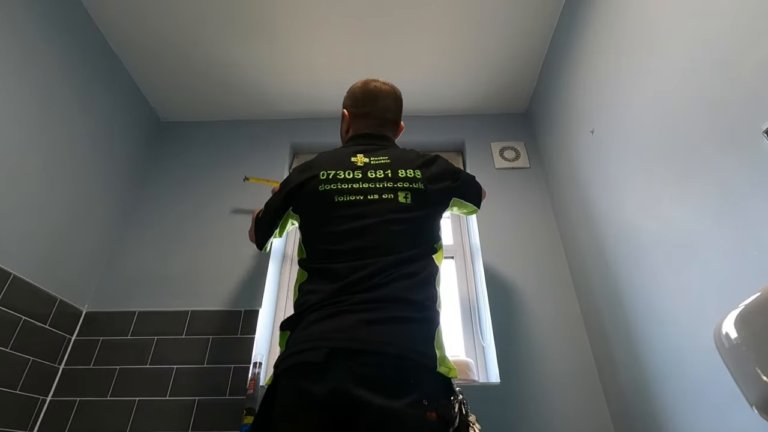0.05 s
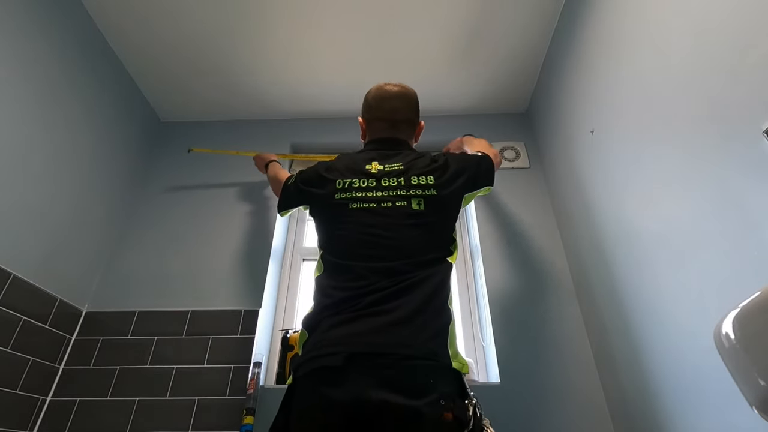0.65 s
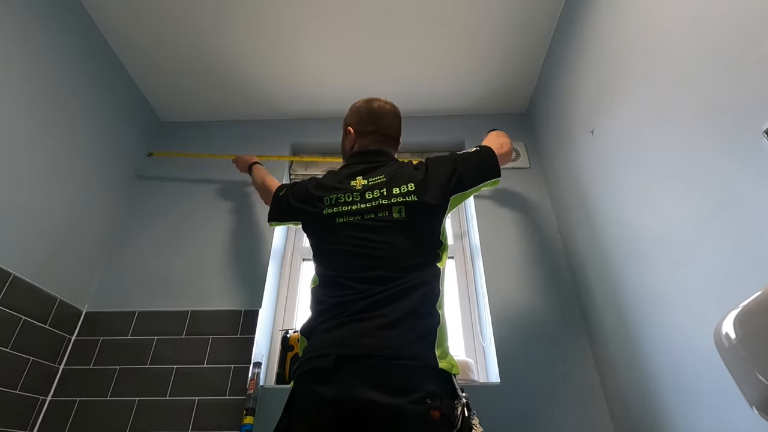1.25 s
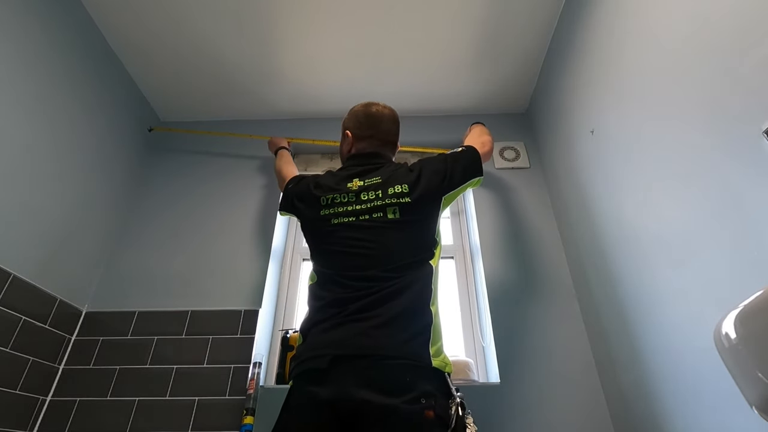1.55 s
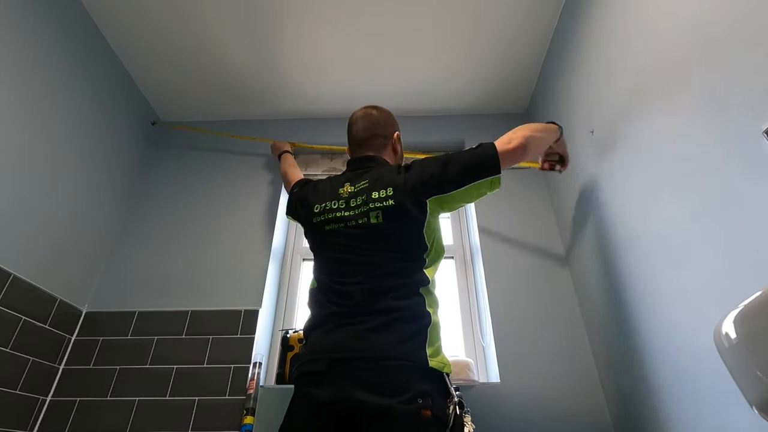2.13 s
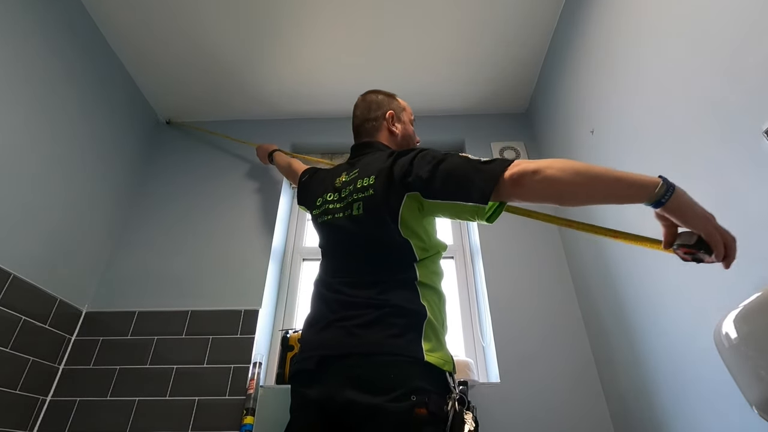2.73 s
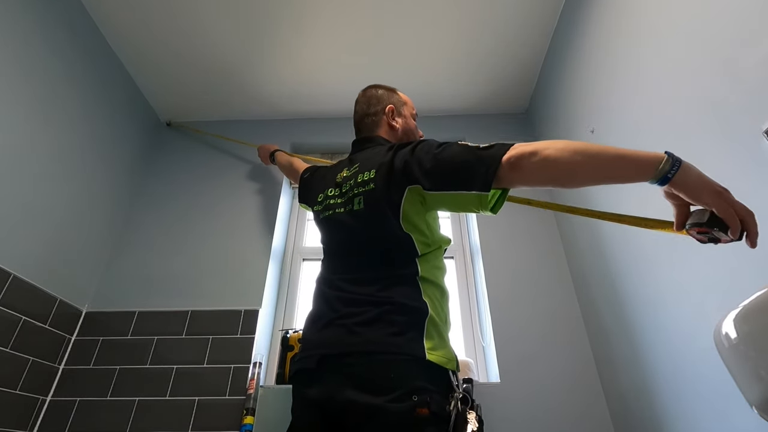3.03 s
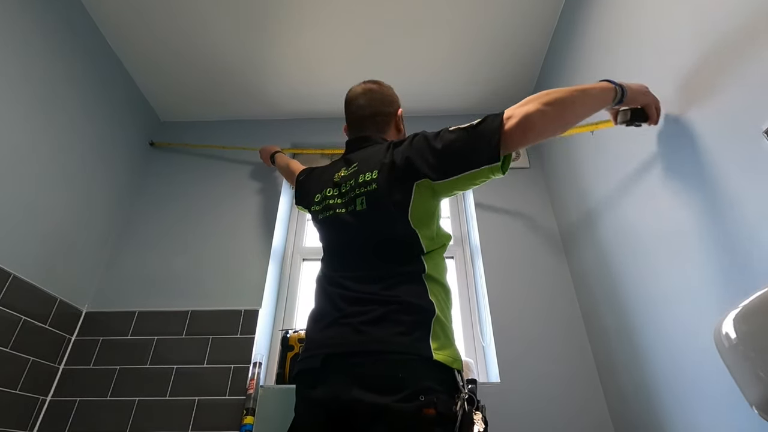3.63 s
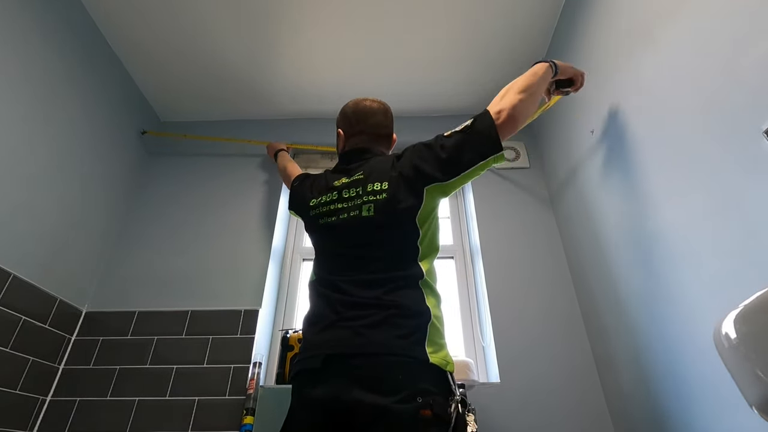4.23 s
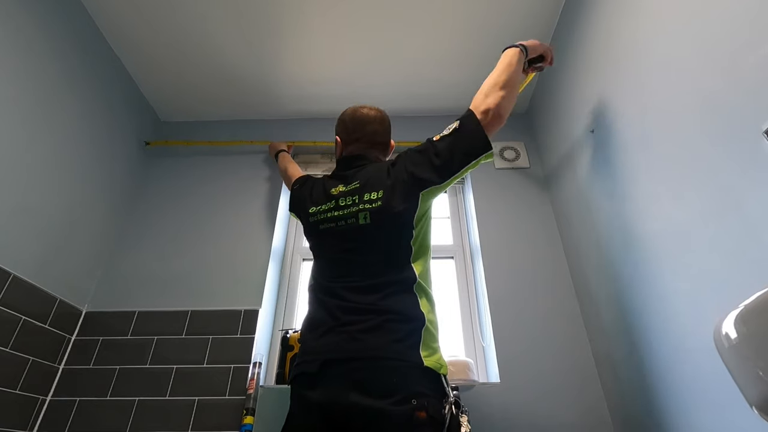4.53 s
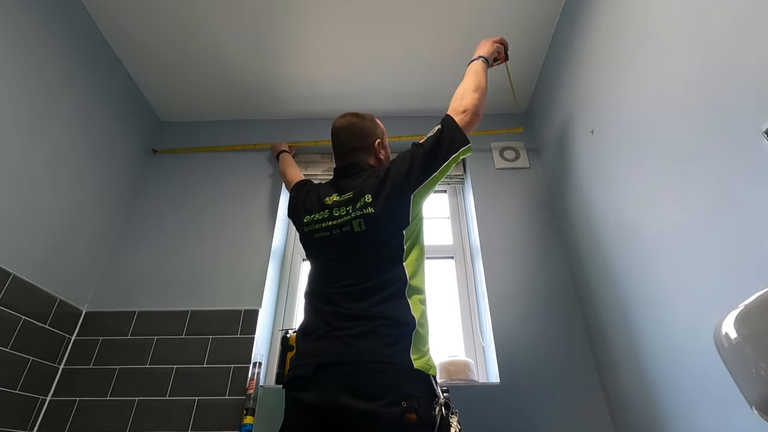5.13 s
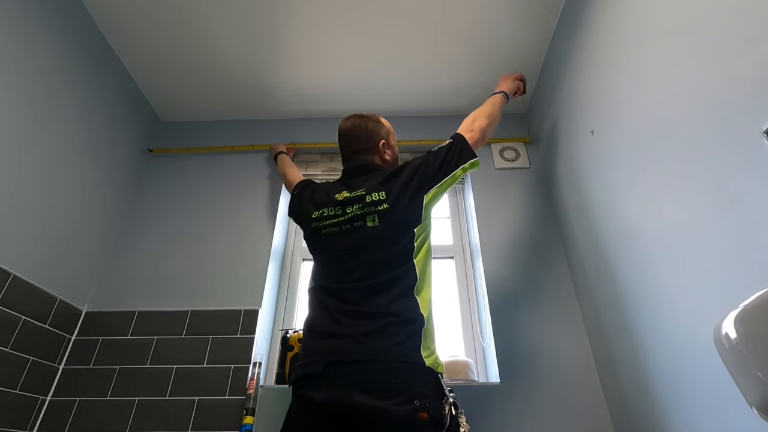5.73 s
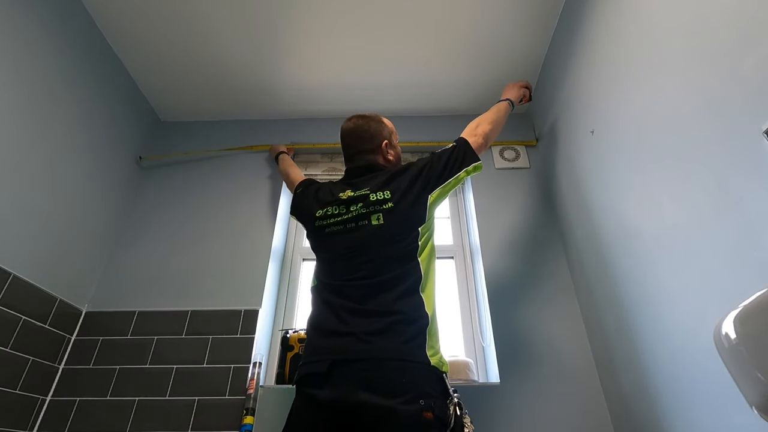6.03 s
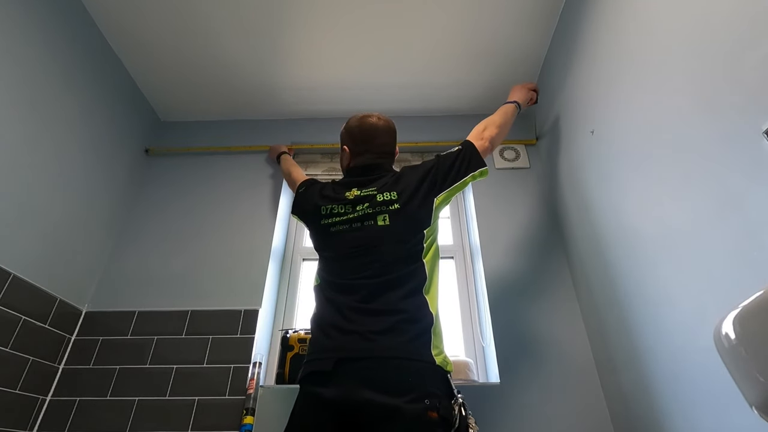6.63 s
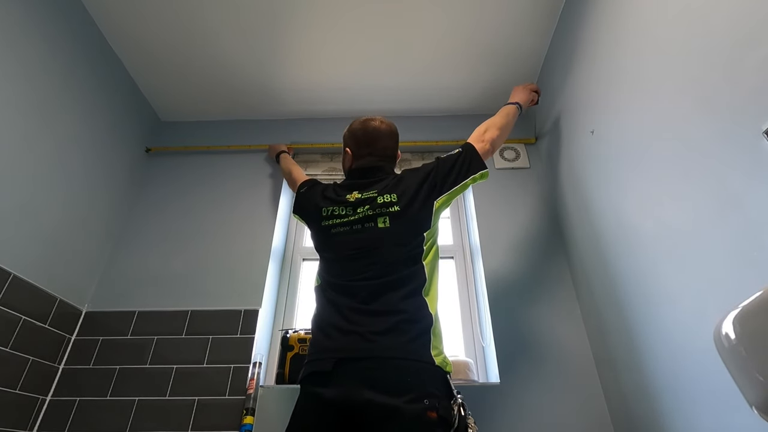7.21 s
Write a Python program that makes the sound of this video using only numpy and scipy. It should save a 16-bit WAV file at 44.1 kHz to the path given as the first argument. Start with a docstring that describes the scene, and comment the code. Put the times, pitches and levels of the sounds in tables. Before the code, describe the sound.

A steel tape measure is pulled out along a wall in uneven, hissing strokes with brief squeals. The case and a hand rub and bump dully on the plaster. The blade clicks and rattles, then buckles with two loud ringing slaps, and its hook clanks in the corner. Softer slides and clicks follow. The microphone is close to the case, in a small bathroom with a short, dense echo.

```python
"""Tape measure in a bathroom

A steel tape is pulled out along the wall of a small, hard-walled bathroom, heard in nearly mono on a
camera microphone near the case. Case and hand rub, hum and bump on the plaster. The blade slips
through the mouth of the case, hissing and squealing, then buckles, slaps the wall and rings; its hook
clanks in the corner. The close walls answer with a short, dense echo over faint room tone."""
import sys
import numpy as np
from scipy import signal
from scipy.io import wavfile
from scipy.ndimage import uniform_filter1d, minimum_filter1d

SR = 44100
rng = np.random.default_rng(int(sys.argv[2]) if len(sys.argv) > 2 else 0)


def inscribe(sig):
    """Save sig as 16-bit PCM at rate SR to the path in sys.argv[1].

    A 1-D sig is mono; a 2-D sig holds one channel per row.
    Samples are clipped to [-1, 1] before scaling.
    """
    pcm = np.round(np.clip(np.atleast_2d(sig).T, -1, 1) * 32767)
    wavfile.write(sys.argv[1], SR, pcm.astype(np.int16))


N = 320671
TIME = np.arange(N) / SR
HZ = np.fft.rfftfreq(4096, 1 / SR)

# Levels in the tables are relative; the points of a spectrum are joined on a log-frequency axis.
# room tone: (frequency [Hz], level [dB])
ROOM_TONE = [(100, -36.5), (180, 1), (600, 3.5), (1300, -3), (4500, -22), (14000, -32)]
# decay of the bathroom: (frequency [Hz], time to fall 60 dB [s])
ROOM_T60 = [(100, 0.19), (300, 0.93), (1400, 0.52), (3700, 0.58), (10000, 0.51)]
# standing waves between the walls: (frequency [Hz])
STANDING_HZ = [193.8, 269.2, 484.5, 732.1, 1157, 1437, 2584]
# overall tone colour, with the top treble cut off steeply: (frequency [Hz], gain [dB])
TONE_COLOUR = [(30, 0), (80, -2.5), (7000, -1), (8600, -6.5), (10000, -6), (12000, -4), (13500, -14.5),
               (15000, -42)]
# how alike the echo is left and right, nearly mono below the top treble:
# (frequency [Hz], correlation [0-1])
STEREO_LIKENESS = [(100, .997), (1200, .9998), (2500, .99997), (7000, .999), (11000, .95), (12200, .2)]
# the top treble of the echo is a little louder on the right: (frequency [Hz], gain [dB])
RIGHT_LIFT = [(11000, 0), (12500, 2.3)]

# low drones of sticking friction: (time [s], length [s], pitch [Hz], level [dB])
DRONES = [(4.387, 0.063, 295.5, -46), (6.081, 0.029, 276, -40), (6.179, 0.035, 319.5, -47)]
# the dragged case hums and rings: (time [s], length [s], hum [dB], ring [dB], ring pitch [Hz])
HUMS = [(0.0, 0.074, -55, -47.5, 1310), (0.97, 0.18, -48, -49.5, 1170), (1.493, 0.24, -53, -51.5, 1280),
        (2.039, 0.48, -54, -58.5, 1200), (5.487, 0.2, -56.5, -50.5, 1240), (7.04, 0.13, -61, -44, 1006)]
# strokes of case and hand along the wall: (time [s], length [s], level [dB])
STROKES = [(0.0, 0.072, -41), (0.32, 0.37, -35.5), (0.575, 0.12, -31), (1.457, 1, -48.5),
           (2.454, 0.59, -40), (3.555, 0.48, -41), (4.3, 0.6, -44.5), (5.29, 0.45, -49.5),
           (5.87, 0.21, -42.5), (6.802, 0.13, -43)]
STROKE_ATTACK_S = 0.033
# friction on plaster: (frequency [Hz], level [dB])
RUB_SPECTRUM = [(30, -43), (70, -28), (130, -13), (200, -6.5), (310, 1.5), (900, -0.5), (1300, 1),
                (4000, -5), (12000, -38)]
# dull bumps of hand and case: (time [s], level [dB], build-up [s], decay [s], boom pitch [Hz])
BUMPS = [(0.089, -44.5, 0.0042, 0.013, 164), (0.424, -30, 0.041, 0.015, 400),
         (0.467, -28.5, 0.0062, 0.026, 158), (0.532, -28, 0.0069, 0.01, 268),
         (0.645, -29, 0.031, 0.032, 415), (0.869, -39.5, 0.013, 0.011, 286),
         (2.46, -27.5, 0.0079, 0.016, 290), (2.848, -33.5, 0.0097, 0.0071, 616),
         (4.936, -36, 0.019, 0.004, 330), (6.611, -43.5, 0.0032, 0.0099, 251)]
# the wall under a soft blow: (frequency [Hz], level [dB])
BUMP_SPECTRUM = [(60, -1.5), (600, 2.5), (1200, -3), (2000, -8), (8000, -26)]

# the blade edge squeals in the case:
# (time [s], length [s], pitch [Hz], glide [Hz/s], width [Hz], level [dB])
SQUEALS = [(.57, 0.11, 6170, 500, 240, -42), (0.898, 0.23, 2530, 600, 720, -32),
           (1.181, 0.033, 2630, 0.5, 396, -34), (3.19, 0.093, 2120, 304, 420, -27),
           (3.415, 0.1, 2510, -2, 520, -23)]
# pulls on the blade: (time [s], run-up [s], length [s], hiss [dB], singing [dB], rasp pitch [Hz])
PULLS = [(0.0, 0.00078, 0.09, -50, -41.5, 5100), (0.441, 0.18, 0.33, -29.5, -35, 6460),
         (0.77, 0.097, 0.29, -30.5, -35.5, 4700), (1.249, 0.058, 0.32, -39.5, -67, 5970),
         (1.76, 0.13, 0.14, -41, -43.5, 6300), (1.84, 0.15, 0.24, -31.5, -63, 5950),
         (2.082, 0.22, 0.49, -29.5, -51, 5660), (2.336, 0.21, 0.4, -26, -29, 4800),
         (3.293, 0.022, 0.4, -30, -26, 4580), (3.631, 0.083, 0.28, -29.5, -31.5, 4770),
         (4.26, 0.13, 0.63, -44, -63, 4800), (5.283, 0.091, 0.035, -30.5, -39, 4620),
         (5.885, 0.1, 0.23, -36.5, -41, 3730), (6.153, 0.13, 0.055, -41.5, -43, 4900),
         (6.85, .06, 0.49, -52, -46, 4670)]
PULL_STOP_DB_PER_S = 65  # the blade coasts to rest
# the blade sliding through the mouth of the case: (frequency [Hz], level [dB])
HISS_SPECTRUM = [(200, -57), (1500, -44), (2800, -3), (4500, 2.5), (6000, -2.5), (7300, -6), (8500, -7),
                 (11000, -8.5), (16000, -26)]
# lower edge of the free blade's ring, shifting as it lengthens and buckles: (time [s], frequency [Hz])
BLADE_EDGE = [(0, 2440), (1, 1970), (2.1, 2400), (2.7, 1750), (3.3, 1760), (3.5, 1880), (4.85, 2230),
              (5.05, 1380), (6.8, 1600)]
# resonances of the blade: (frequency [Hz], width [Hz], level [dB])
BLADE_MODES = [(1180, 90, 24), (1700, 31, 11.5), (2013, 360, 7), (2420, 460, 3), (2710, 110, -1.5),
               (3200, 170, 3.5)]
# the long blade folds over: (time [s], level [dB])
KINKS = [(5.058, -21), (5.144, -24)]
# standing waves of the bathroom set ringing by the folds: (frequency [Hz], level [dB])
KINK_WAVES = [(925, -5), (1705, 0.5), (2045, 1), (2200, -6), (2270, 3.5), (2390, 2), (2750, -11),
              (3100, -12)]
# the hook strikes the corner of the wall: (time [s], level [dB], chatter decay [s])
HOOK_HITS = [(5.6219, -19, 0.0042), (7.146, -40.5, 0.02)]
# resonances of the hook and the blade tip: (frequency [Hz], width [Hz], level [dB])
HOOK_MODES = [(650, 50, -14.5), (1220, 130, -8), (1440, 150, -8), (1790, 130, -5.5), (2000, 160, 2),
              (2440, 110, -1), (2690, 140, -6.5), (3170, 200, -1.5), (3730, 340, -6.5), (4800, 920, -16)]

# the case knocks on the plaster: (time [s], level [dB], chatter decay [s])
KNOCKS = [(2.458, -25, 0.0062), (2.475, -23, 0.012), (4.937, -41, 0.005), (6.609, -45.5, 0.021)]
# the blade catches in the case: (time [s], level [dB], tick centre [Hz], build-up [s], chatter decay [s])
CLICKS = [(0.0853, -18.5, 6000, 0.0042, 0.013), (2.832, -19, 4020, 0.02, 0.0068),
          (3.238, -30.5, 3380, 0.00027, 0.0046), (3.452, -23, 3750, 0.0003, 0.0036),
          (3.515, -21.5, 3740, 0.0005, 0.0077), (3.616, -14, 4620, 0.0022, 0.025),
          (3.727, -32, 3830, 0.00033, 0.0022), (4.247, -44, 3520, 0.0002, 0.015),
          (4.484, -30.5, 4570, 0.0032, 0.022), (4.709, -27, 4150, 0.0045, 0.028),
          (5.526, -36, 4370, 0.0037, 0.044), (5.893, -33, 3900, 0.0047, 0.0095),
          (6.584, -50, 4960, 0.0021, 0.012), (6.787, -34.5, 4800, 0.012, 0.028),
          (6.8336, -20, 3660, 0.00034, 0.007)]
# the blade buckles and slaps the wall:
# (time [s], ring [dB], contact [dB], tick centre [Hz], chatter decay [s])
SLAPS = [(0.089, -24, -51, 3820, 0.0046), (1.411, -49, -64, 3360, 0.0021), (1.499, -58, -46, 4430, .005),
         (2.105, -31.5, -62, 3000, 0.001), (2.123, -39, -58, 2920, 0.0055), (2.457, -25, -44, 3200, 0.032),
         (2.618, -17, -21, 3960, 0.0063), (2.858, -18.5, -25, 3800, 0.02), (2.963, -25, -26.5, 3730, 0.014),
         (3.158, -19.5, -26.5, 3430, 0.012), (3.426, -30, -32.5, 3800, 0.0018),
         (3.825, -26.5, -25.5, 3600, 0.008), (5.058, -21, -16, 2900, 0.027),
         (5.144, -20.5, -21, 3050, 0.023), (5.6213, -31, -23.5, 3980, 0.0094),
         (7.146, -30.5, -32, 5160, 0.021)]
SNAP_S = 0.0003  # rise of a sharp blow
# plaster under a hard blow: (frequency [Hz], level [dB])
KNOCK_SPECTRUM = [(60, -57), (350, -2), (520, -3), (670, 5.5), (790, 2), (925, 9.5), (1050, -4),
                  (1190, 8.5), (1800, 8), (3000, -3.5), (8000, -41)]
# a tick centred on 4000 Hz: (frequency [Hz], level [dB])
TICK_SPECTRUM = [(300, -38.5), (1900, -7), (3200, 1.5), (4300, 1), (5500, -4.5), (7500, -13),
                 (16000, -25.5)]


def amp(db):
    """Decibels to gain."""
    return 10 ** (np.asarray(db) / 20)


def unit(x):
    """Scales to rms 1."""
    return x / np.sqrt(np.mean(x ** 2) + 1e-20)


def at_hz(table, hz):
    """A frequency table read on a log axis."""
    table_hz, value = np.transpose(table)
    return np.interp(np.log(hz + 1), np.log(table_hz), value)


def add(mix, start_s, sound):
    """Mixes a sound in at start_s."""
    part = mix[max(round(start_s * SR), 0):][:len(sound)]
    part += sound[:len(part)]


def hump(hz, width):
    """Gain over HZ of one steep-sided resonance."""
    return 1 / (1 + (2 * (HZ - hz) / width) ** 2)


def impulse_response(gain):
    """The minimum-phase ring of a body with this gain over HZ."""
    log_gain = np.log(np.maximum(gain, gain.max() * 1e-5))
    mirrored = np.concatenate([log_gain, log_gain[-2:0:-1]])
    return np.fft.ifft(np.exp(np.conj(signal.hilbert(mirrored)))).real


def colour(x, gain):
    """Passes x through a body with this gain over HZ."""
    return signal.oaconvolve(x, impulse_response(gain))[:len(x)]


def resonate(x, hz, width):
    """A resonance that follows the pitch curve hz."""
    turn = np.exp(2j * np.pi * np.cumsum(hz) / SR)
    pole = np.exp(-np.pi * width / SR)
    return 2 * (turn * signal.lfilter([1 - pole], [1, -pole], x / turn)).real


def friction(per_s, spread_db):
    """A train of tiny slips of random size and sign."""
    size = amp(spread_db * np.minimum(rng.exponential(1, N), 4))
    return unit(size * rng.standard_normal(N) * (rng.random(N) < per_s / SR))


def chatter(rise_s, fall_s, per_s=2600, snap=5, snap_s=0.0016):
    """A blow as a burst of contacts of energy 1: it builds up, or starts with one snap, and dies away."""
    t = np.arange(SR // 7) / SR
    rise_s, fall_s = np.clip(rise_s, 1e-4, .05), np.clip(fall_s, 5e-4, .03)
    contacts = rng.standard_normal(len(t)) * (rng.random(len(t)) < per_s / SR)
    contacts[int(rise_s * SR)] = snap / (1 + rise_s / snap_s)  # a quicker blow snaps harder
    contacts *= np.minimum(t / rise_s, 1) * np.exp(-np.maximum(t - rise_s, 0) / fall_s)
    return contacts / np.linalg.norm(contacts)


def gesture(start_s, attack_s, length_s, stop_db_per_s):
    """Gain of one arm movement: it gathers speed, holds, and dies away."""
    t = TIME - start_s
    run_up = np.sin(np.pi / 2 * np.clip(t / attack_s, 0, 1)) ** 2
    return run_up * amp(-stop_db_per_s * np.maximum(t - length_s, 0))


def room_tone(level_db=-60, apart_db=-16):
    """Faint steady air in the bathroom, a little different left and right."""
    shared, left, right = (unit(colour(noise, amp(at_hz(ROOM_TONE, HZ))))
                           for noise in rng.standard_normal((3, N)))
    return amp(level_db) * (shared + amp(apart_db) * np.array([left, right]))


def room_response(early_db=2, early_s=0.0023):
    """Echo from one spot: close walls, then a dense tail, nearly mono below the top treble."""
    t = np.arange(SR * 3 // 4) / SR
    echoes = rng.choice([-1., 1.], (2, len(t))) * (rng.random((2, len(t))) < .2)
    echoes *= 1 + amp(early_db) * np.exp(-t / early_s)
    hz, age_s, bands = signal.stft(echoes, SR, nperseg=256)
    likeness = np.clip(at_hz(STEREO_LIKENESS, hz), 0, 1)[:, None]
    bands[1] = likeness * bands[0] + np.sqrt(1 - likeness ** 2) * bands[1]
    bands[1] *= amp(at_hz(RIGHT_LIFT, hz))[:, None]
    decay = amp(-60 * age_s / at_hz(ROOM_T60, hz)[:, None])
    tail = signal.istft(bands * decay, SR, nperseg=256)[1]
    return tail / np.linalg.norm(tail[0])


def echo(x):
    """The room's answer at the microphone to a sound from one random spot."""
    return signal.oaconvolve(x[None], room_response(), axes=1)[:, :N]


def room(x, spots=4):
    """The echo pattern changes gradually as the tape travels along the wall."""
    place = TIME / TIME[-1] * (spots - 1)
    return sum(echo(x * np.cos(np.pi / 2 * np.clip(place - k, -1, 1))) for k in range(spots))


def standing_waves(x, waves_db=-5, width_hz=14, level_db=-0.17):
    """The small room favours a few narrow pitches."""
    waves = sum(signal.lfilter(*signal.iirpeak(hz, hz / width_hz, fs=SR), x) for hz in STANDING_HZ)
    return amp(level_db) * (x + amp(waves_db) * waves)


def friction_drones(glide=0.122, attack_s=0.013, tail_s=0.12, stutter=0.78):
    """Short soft tones of sticking friction that stutter, rise a little and die away."""
    out, t = np.zeros(N), np.arange(SR // 2) / SR
    for start, length, hz, db in DRONES:
        pitch = hz * (1 + glide * (np.minimum(t / length, 1) - .5))
        envelope = np.minimum(t / attack_s, 1) * np.exp(-np.maximum(t - length, 0) / tail_s)
        wobble = uniform_filter1d(uniform_filter1d(rng.standard_normal(len(t)), size=400), size=300)
        grip = 1 + stutter * unit(wobble)
        add(out, start, amp(db) * envelope * grip * np.sin(2 * np.pi * np.cumsum(pitch) / SR))
    return out


def case_hum(shell_hz=334.4, shell_width_hz=41, ring_width_hz=134):
    """Light friction keeps the hollow shell of the dragged case humming and faintly ringing."""
    slips, out = friction(per_s=900, spread_db=1.5), np.zeros(N)
    shell = unit(colour(slips, hump(shell_hz, shell_width_hz)))
    for start, length, hum_db, ring_db, ring_hz in HUMS:
        ring = unit(colour(slips, hump(ring_hz, ring_width_hz)))
        drag = gesture(start, STROKE_ATTACK_S, length, PULL_STOP_DB_PER_S)
        out += (amp(hum_db) * shell + amp(ring_db) * ring) * drag
    return out


def wall_rub():
    """Dull, lumpy friction of case and hand on plaster, heard through the room."""
    lumps = colour(friction(per_s=700, spread_db=4), amp(at_hz(RUB_SPECTRUM, HZ)))
    strokes = [amp(db) * gesture(start, STROKE_ATTACK_S, length, stop_db_per_s=36.5)
               for start, length, db in STROKES]
    return unit(room(lumps)) * np.linalg.norm(strokes, axis=0)


def wall_bumps(level_db=33, direct_db=-5, boom_db=6, width_ratio=0.39, low_cut_ratio=0.64):
    """Soft blows on the hollow wall; each spot booms at its own pitch."""
    out = np.zeros(N)
    for start, db, rise_s, fall_s, hz in BUMPS:
        wall = amp(at_hz(BUMP_SPECTRUM, HZ)) / np.hypot(1, (low_cut_ratio * hz / (HZ + 1)) ** 4)
        wall *= 1 + amp(boom_db) * hump(hz, width_ratio * hz)
        add(out, start, amp(db + level_db) * colour(chatter(rise_s, fall_s), unit(wall)))
    return room(out, spots=2) + amp(direct_db) * out


def blade_squeals():
    """Quick slips of the blade edge drive one resonance, which glides as the blade runs out."""
    slips, out = friction(per_s=2200, spread_db=0), np.zeros(N)
    for start, length, hz, glide, width, db in SQUEALS:
        pitch = hz + glide * np.clip(TIME - start, 0, length)
        tone = unit(resonate(resonate(slips, pitch, width), pitch, width))
        out += amp(db) * tone * gesture(start, attack_s=0.016, length_s=length, stop_db_per_s=400)
    return room(out, spots=2)


def blade_gain(time_s, db_per_octave, corner_hz, bed_db, skirt_db):
    """The steel at one moment: a steep lower edge, resonances on a dense bed of modes, falling treble."""
    peak_power = sum(amp(db) ** 2 * hump(hz, width) for hz, width, db in BLADE_MODES)
    edge_hz = np.interp(time_s, *np.transpose(BLADE_EDGE))
    octaves = np.log2((HZ + 1) / edge_hz)
    skirt = amp(skirt_db + 10 * np.minimum(octaves, 0))
    edge = np.maximum(1 / (1 + np.exp(-np.clip(octaves * 18, -50, 50))), skirt)
    slope = amp(-db_per_octave * np.maximum(np.log2((HZ + 1) / corner_hz), 0))
    return unit(np.sqrt(peak_power + amp(bed_db) ** 2) * edge * slope)


def pulling():
    """Hiss gain, singing gain and rasp pitch over time; the strongest pull weighs most in the pitch."""
    _, _, _, hiss_db, sing_db, rasp_hz = np.transpose(PULLS)
    pulls = [gesture(start, run_up, length, PULL_STOP_DB_PER_S) for start, run_up, length, *_ in PULLS]
    power = np.array(pulls) ** 2 + 1e-12
    hiss, sing = amp(hiss_db) ** 2, amp(sing_db) ** 2
    return np.sqrt(hiss @ power), np.sqrt(sing @ power), (rasp_hz * hiss) @ power / (hiss @ power)


def blade_slide(rasp_db=-2, rasp_width_hz=800, surge_db=1.9, stages=10):
    """Fine slips at the mouth of the case hiss; coarser ones set the lengthening blade singing."""
    hiss_gain, sing_gain, rasp_hz = pulling()
    mouth = amp(at_hz(HISS_SPECTRUM, HZ))
    fine = colour(friction(per_s=2300, spread_db=6), mouth)
    rasp = resonate(colour(friction(per_s=3200, spread_db=-5.5), mouth), rasp_hz, rasp_width_hz)
    uneven_grip = amp(surge_db * unit(uniform_filter1d(rng.standard_normal(N), size=600)))
    hiss = room(uneven_grip * (unit(fine) + amp(rasp_db) * unit(rasp)))
    coarse = friction(per_s=1200, spread_db=4)
    stage = TIME / TIME[-1] * (stages - 1)  # each length of blade fades into the next
    singing = np.zeros(N)
    for k, time_s in enumerate(np.linspace(0, TIME[-1], stages)):
        steel = blade_gain(time_s, db_per_octave=12.5, corner_hz=2540, bed_db=39, skirt_db=-6.5)
        singing += colour(coarse * np.maximum(1 - abs(stage - k), 0), steel)
    return unit(hiss) * hiss_gain + unit(room(singing)) * sing_gain


def blade_kinks(level_db=35, t60_s=0.55, swell_s=0.0078):
    """Each fold of the blade sets a cluster of the room's standing waves ringing."""
    t, out = np.arange(SR) / SR, np.zeros(N)
    for start, db in KINKS:
        ring = sum(amp(mode_db) * np.sin(2 * np.pi * (hz * t + rng.random()))
                   for hz, mode_db in KINK_WAVES)
        ring *= np.minimum(t / swell_s, 1) * amp(-60 * t / t60_s)
        add(out, start, amp(db + level_db) * ring / np.linalg.norm(ring))
    return out


def hook_clanks(level_db=35, direct_db=-7, ring_db=-6, t60_s=0.37, swell_s=0.0035):
    """The steel hook clanks in the corner, and its modes ring on."""
    t = np.arange(SR * 3 // 4) / SR
    body = unit(np.linalg.norm([amp(db) * hump(hz, width) for hz, width, db in HOOK_MODES], axis=0))
    ring = sum(amp(db - 60 * t / t60_s) * np.sin(2 * np.pi * hz * t) for hz, _, db in HOOK_MODES)
    ring *= np.sin(np.pi / 2 * np.minimum(t / swell_s, 1)) ** 2
    clanks, rings = np.zeros((2, N))
    for start, db, fall_s in HOOK_HITS:
        add(clanks, start, amp(db) * colour(chatter(SNAP_S, fall_s), body))
        add(rings, start, amp(db) * ring / np.linalg.norm(ring))
    return amp(level_db) * (room(clanks, spots=2) + amp(direct_db) * clanks + amp(ring_db) * rings)


def blows():
    """Slaps, clicks and knocks each have their own balance of steel ring, plaster knock and tick."""
    # (time [s], ring [dB], knock [dB], tick [dB], tick centre [Hz], build-up [s], chatter decay [s])
    slaps = [(start, ring, db - 8.5, db, hz, SNAP_S, fall) for start, ring, db, hz, fall in SLAPS]
    clicks = [(start, db - 11, db - 18, db, hz, rise, fall) for start, db, hz, rise, fall in CLICKS]
    knocks = [(start, db - 28, db, db - 7, 3600, SNAP_S, fall) for start, db, fall in KNOCKS]
    return slaps + clicks + knocks


def tape_clacks(level_db=35, direct_db=-1, direct_db_per_decade=8, spots=4):
    """Chatter of blade and case rings the steel, knocks the plaster and ticks at the rim."""
    at_spots, direct = np.zeros((spots, N)), np.zeros(N)
    for start, ring_db, knock_db, tick_db, tick_hz, rise_s, fall_s in blows():
        steel = blade_gain(start, db_per_octave=25.5, corner_hz=.98 * tick_hz, bed_db=-3.5, skirt_db=-22)
        plaster = unit(amp(at_hz(KNOCK_SPECTRUM, HZ)))
        rim = unit(amp(at_hz(TICK_SPECTRUM, HZ * 4000 / tick_hz)))
        parts = [amp(ring_db) * steel, amp(knock_db) * plaster, amp(tick_db) * rim]
        body = impulse_response(amp(level_db) * np.linalg.norm(parts, axis=0))
        contacts = chatter(rise_s, fall_s)
        # contacts land on different spots along the blade, each with its own echoes
        landed = contacts * (rng.integers(0, spots, len(contacts)) == np.arange(spots)[:, None])
        struck = signal.fftconvolve(landed, body[None], axes=1)
        for spot, blow in zip(at_spots, struck):
            add(spot, start, blow)
        # short snaps come from the case near the microphone, long rattles from the far blade
        nearness = amp(direct_db - direct_db_per_decade * np.log10(max(fall_s * 1000, 1)))
        add(direct, start, nearness * struck.sum(0))
    return direct + sum(echo(spot) for spot in at_spots)


def scene():
    """The tape and the bathroom as they arrive at the microphone."""
    tape = tape_clacks() + wall_bumps() + blade_slide() + blade_squeals()
    background = wall_rub() + case_hum() + friction_drones() + room_tone()
    return standing_waves(tape + background) + hook_clanks() + blade_kinks()


def record(dry, notch_hz=9050, notch_width_hz=600, ceiling=0.93, limiter_samples=60, cut_hz=15800):
    """The microphone ports notch the treble; a quick limiter holds the peaks; the top is cut off."""
    notch = abs(HZ - notch_hz) / np.hypot(HZ - notch_hz, notch_width_hz / 2) + .04
    heard = np.array([colour(side, notch * amp(at_hz(TONE_COLOUR, HZ))) for side in dry])
    allowed_gain = 1 / np.maximum(abs(heard).max(0) / ceiling, 1)
    limited = heard * uniform_filter1d(minimum_filter1d(allowed_gain, limiter_samples), limiter_samples)
    low_pass = signal.firwin(511, cut_hz, window=("kaiser", 9), fs=SR)
    return signal.oaconvolve(limited, low_pass[None], "same")


dry = scene()
out = record(dry)
inscribe(out)
```